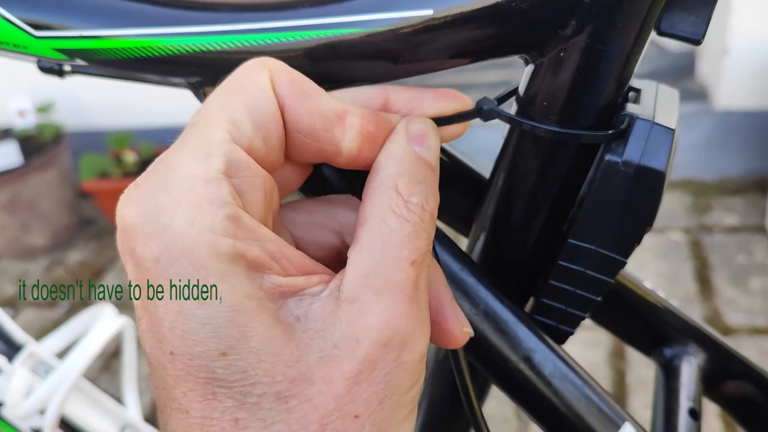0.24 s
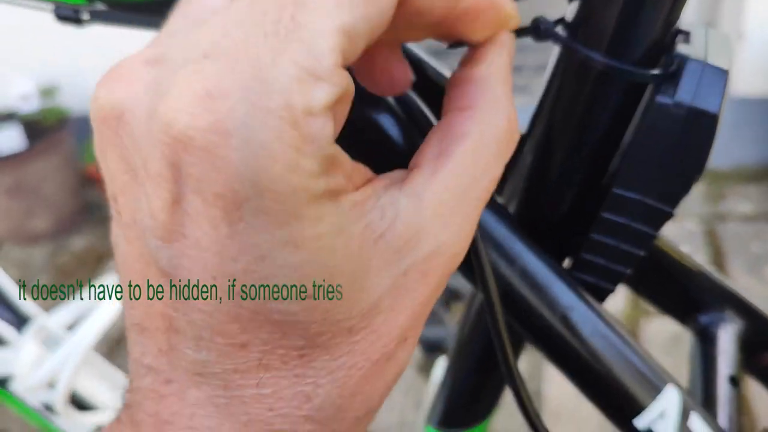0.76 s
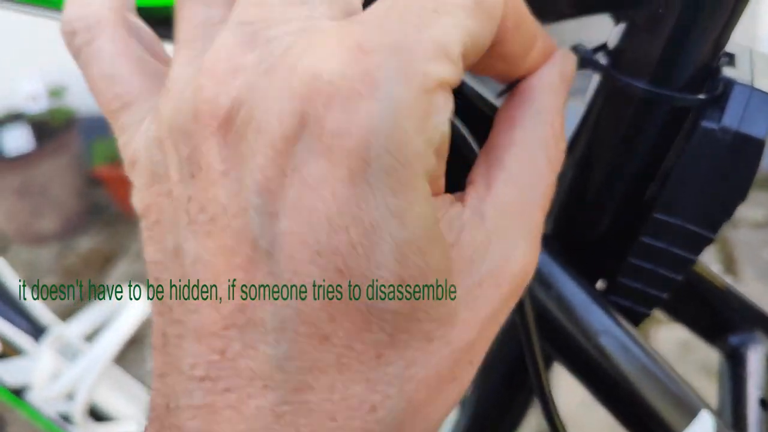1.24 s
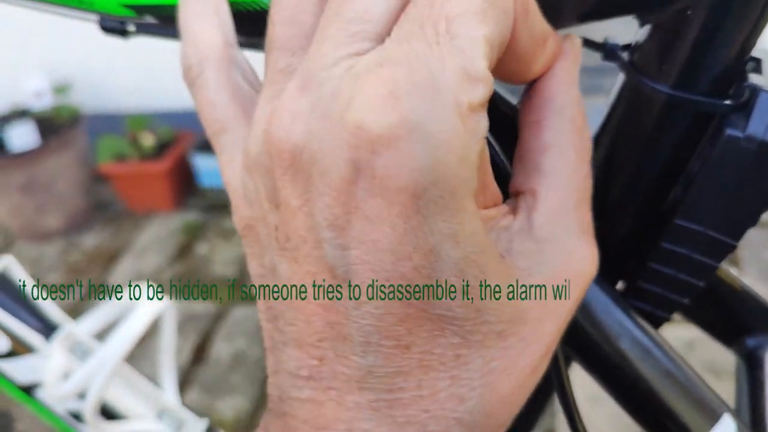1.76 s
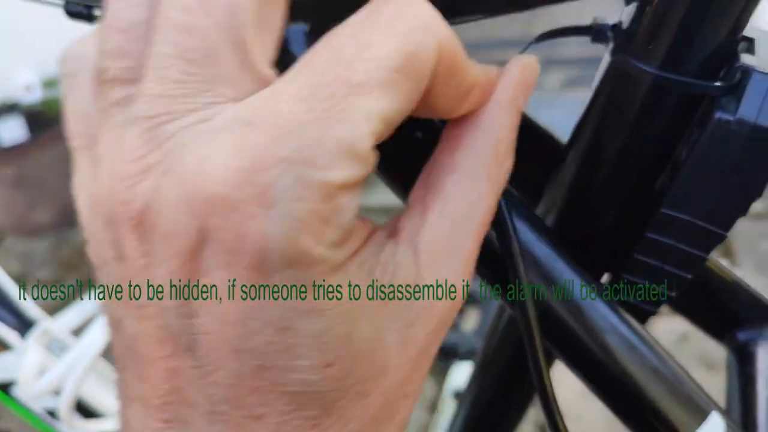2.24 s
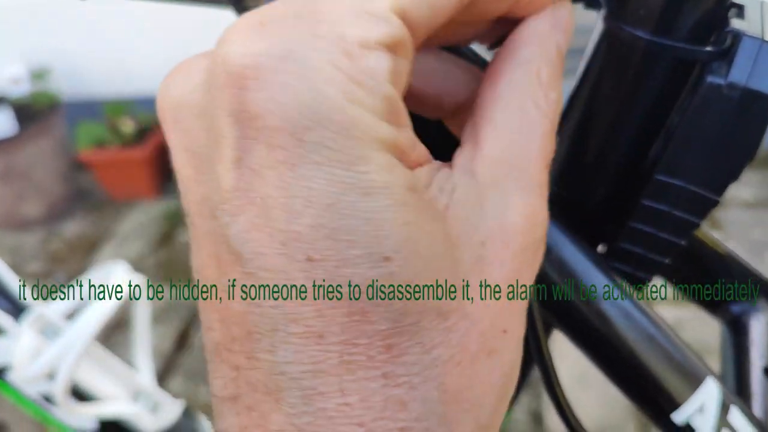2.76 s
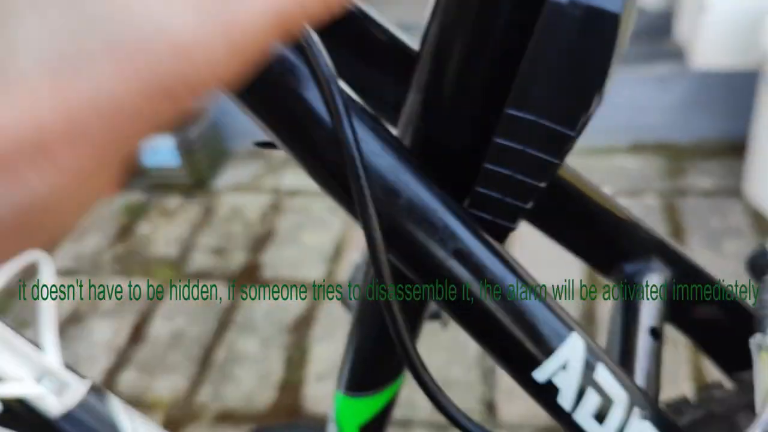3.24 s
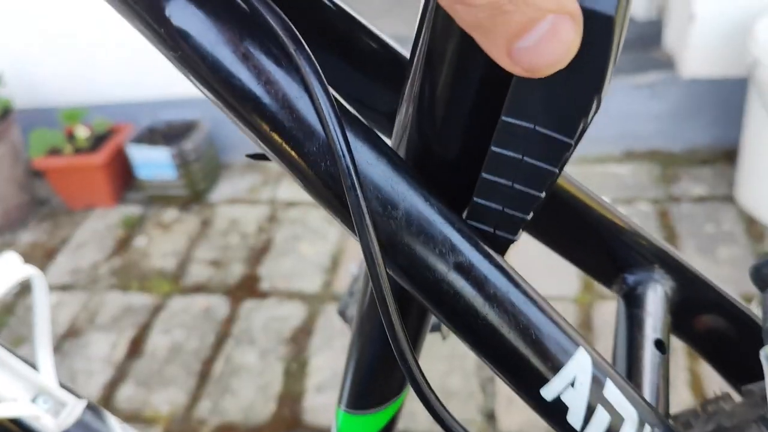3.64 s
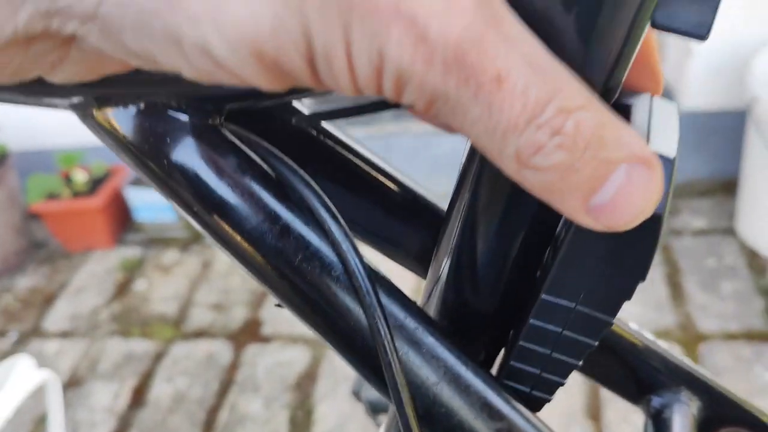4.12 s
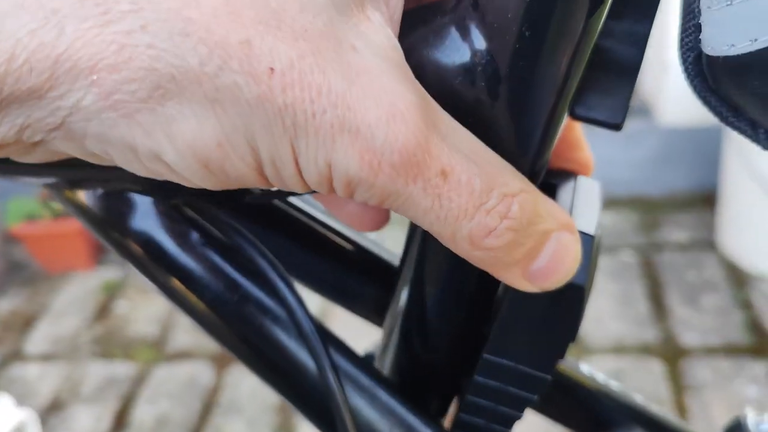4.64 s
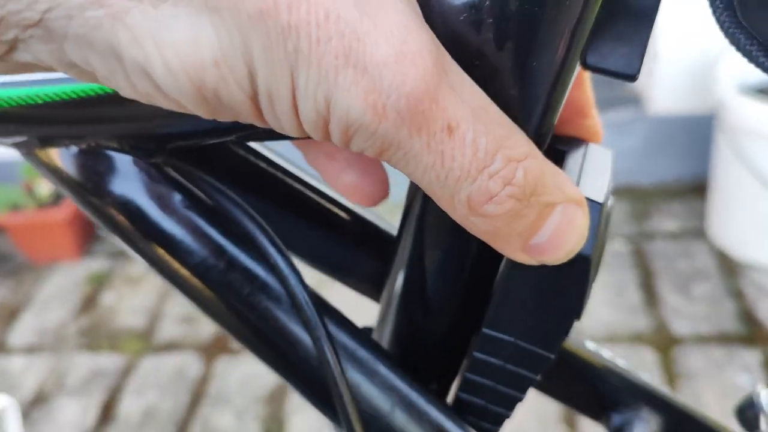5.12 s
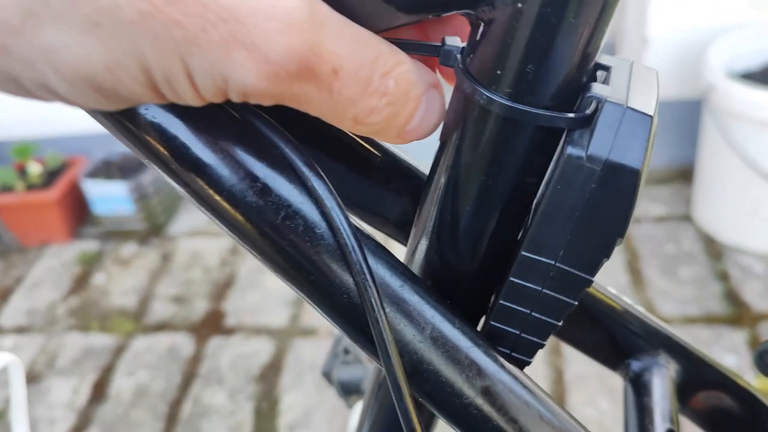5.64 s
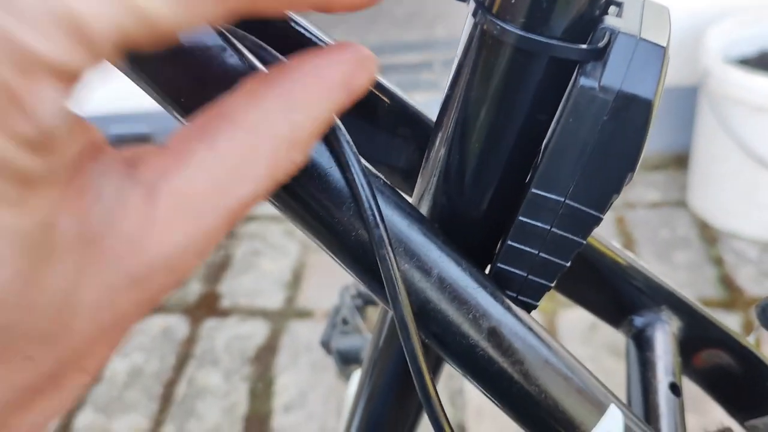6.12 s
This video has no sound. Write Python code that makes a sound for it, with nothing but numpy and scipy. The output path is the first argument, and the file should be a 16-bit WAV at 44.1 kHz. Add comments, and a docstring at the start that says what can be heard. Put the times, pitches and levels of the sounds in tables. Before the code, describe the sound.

Very close, leaning to the right, a nylon cable tie ratchets: a handful of crisp bright snaps at once, a pause with faint rubbing, then a tighter run of snaps. Later, fingers squeak and scrape on a small hollow plastic housing and tap it irregularly. Behind, in an open yard, soft traffic and a low engine drone come gradually nearer.

```python
"""A nylon cable tie is pulled tight round a bicycle tube in a yard, close to the right microphone.
Its pawl snaps from tooth to tooth: noise bursts over the decaying modes of a plastic housing.
Fingers rub on strap and housing: random grains sing in a resonance, scrape and hiss.
A far engine, summed from orders of its camshaft speed, comes slowly nearer over tyre roar.
Farther traffic and the hiss of the yard are coloured stereo noise."""
import sys
import numpy as np
from scipy.fft import rfft, irfft, next_fast_len
from scipy.io import wavfile
from scipy.ndimage import map_coordinates

SR = 44100
rng = np.random.default_rng(int(sys.argv[2]) if len(sys.argv) > 2 else 0)


def inscribe(sig):
    """Save sig as 16-bit PCM at rate SR to the path in sys.argv[1].

    A 1-D sig is mono; a 2-D sig holds one channel per row.
    Samples are clipped to [-1, 1] before scaling.
    """
    pcm = np.round(np.clip(np.atleast_2d(sig).T, -1, 1) * 32767)
    wavfile.write(sys.argv[1], SR, pcm.astype(np.int16))


N = 281358  # samples


def amp(db):
    """Level law: decibels to an amplitude ratio."""
    return 10 ** (np.asarray(db) / 20)


def unit(x):
    """Power normalization: scale to rms 1."""
    return x / np.sqrt(np.mean(x ** 2) + 1e-20)


def along(points, hz):
    """Logarithmic frequency scale: interpolate (Hz, value) points along it."""
    f, v = np.transpose(points)
    return np.interp(np.log(hz + 1), np.log(f + 1), v)


def curves(rows):
    """Linear interpolation in time: one value per sample for each column after the time."""
    s, *columns = np.transpose(rows)
    return [np.interp(np.arange(N) / SR, s, column) for column in columns]


def wobble(rate):
    """Slow random modulation: a smooth curve through random knots, rate of them a second."""
    knots = rng.standard_normal(int(N * rate / SR) + 4)
    return map_coordinates(knots, [np.arange(N) * rate / SR])


def filtered(x, response):
    """Linear filtering: multiply the spectrum of x by a response of frequency."""
    m = next_fast_len(x.shape[-1] + 8192)
    spectrum = rfft(x, m) * response(np.fft.rfftfreq(m, 1 / SR))
    return irfft(spectrum, m)[..., :x.shape[-1]]


def sides(db):
    """Interchannel level difference: left and right gains that differ by db and average to 1."""
    return 2 * np.array([amp(db), np.ones_like(db)]) / (1 + amp(db))


# Interchannel correlation of the noises. Each row: frequency in Hz, left-right likeness from -1 to 1.
LIKENESS = [(60, 0.39), (290, 0.74), (640, 0.47), (1410, -0.13), (3100, -0.19), (7000, 0.72)]
# Interchannel balance of the noises. Each row: frequency in Hz, left level over right in dB.
NOISE_LEAN = [(100, -3), (640, 1), (1410, -8.5), (3100, -3), (6800, -0.5), (15000, -16.5)]


def rush(spectrum):
    """Interchannel coherence: coloured stereo noise from a shared and an opposed part, middle rms 1."""
    def mixing(hz):
        angle = np.arccos(np.clip(along(LIKENESS, hz), -1, 1)) / 2
        return [np.cos(angle), np.sin(angle)]

    shared, opposed = filtered(rng.standard_normal((2, N)), mixing)
    pair = np.array([shared + opposed, shared - opposed])
    pair = filtered(pair, lambda hz: amp(along(spectrum, hz)) * sides(along(NOISE_LEAN, hz)))
    return pair / np.std(pair.mean(0))


# Colour of the yard's hiss. Each row: frequency in Hz, relative level in dB per Hz.
HISS_COLOUR = [(1500, -42), (2500, -26), (3400, -19), (4400, 1), (5150, -6.5), (6000, 0.5), (7700, -7.5),
               (9500, -2.5), (12000, 1), (14300, -10), (14500, -70)]


def hiss():
    """Stationary noise: the steady bright hiss of the yard."""
    return amp(-75.5) * rush(HISS_COLOUR)


# Level of the farther traffic. Each row: time in seconds, level in dB before a random swell.
TRAFFIC_LEVEL = [(0, -69.5), (1, -72), (2, -69.5), (2.8, -67.5), (3.6, -67), (4.7, -65.5), (5.5, -66),
                 (6.38, -67)]
# Colour of the farther traffic. Each row: frequency in Hz, relative level in dB per Hz.
TRAFFIC_COLOUR = [(300, -15.5), (500, -2.5), (650, -7), (800, -0.5), (1000, 3), (1200, -8.5), (1600, -46),
                  (3000, -120)]


def traffic():
    """Amplitude-modulated noise: a dull wash from a road farther off."""
    swell_db = 2 * wobble(4)
    return amp(curves(TRAFFIC_LEVEL)[0] + swell_db) * rush(TRAFFIC_COLOUR)


# Levels of the engine before further random sway: the roar grows, four strong orders waver irregularly.
# Each row: time in seconds, tyre roar in dB, then levels in dB of the four strong orders.
ENGINE_LEVELS = [(0, -63.5, -72, -69, -76, -78), (.5, -63, -78, -66, -81, -86),
                 (1.3, -63, -71, -63.5, -77, -73.5), (2.4, -61, -67, -62.5, -80, -63.5),
                 (3.1, -61, -69, -63, -67, -65), (3.65, -58, -63.5, -66, -64.5, -64.5),
                 (4, -58, -71, -62.5, -73, -58.5), (4.5, -58, -59, -68, -60.5, -60),
                 (4.85, -56.5, -69, -63.5, -67, -67), (5.2, -56.5, -70, -56.5, -70, -62),
                 (5.6, -53, -59, -85, -55.5, -70), (6, -53, -58, -53, -58.5, -54),
                 (6.38, -53, -52, -56, -62, -56)]
STRONG_ORDERS = (3, 4, 8, 12)  # multiples of the camshaft speed
# Speed of the camshaft. Each row: time in seconds, turns a second in Hz.
CAMSHAFT_SPEED = [(0, 19.3), (1, 19), (2, 18.8), (3.5, 18.58), (4.5, 18.4), (6.38, 18.13)]
# Weak orders, before random sway. Each row: order, level at the loudest roar in dB relative to 10 dB
# below that roar, growth in dB per dB of roar.
WEAK_ORDERS = [(7, -2, 1.1), (9, -7, 1.5), (10, -5.5, 0.8), (11, -4, 1.5), (13, 2.5, 2.7), (14, -1, 1.9),
               (15, -7.5, 1.6)]
# Colour of the tyre roar. Each row: frequency in Hz, relative level in dB per Hz.
ROAR_COLOUR = [(20, -22), (60, -18.5), (130, -14), (250, -15.5), (340, -23.5), (520, -23), (1100, -24.5),
               (1450, -17), (1700, -22), (1950, -15.5), (2500, -24.5), (3500, -35), (6000, -56.5),
               (9000, -92)]


def engine():
    """Harmonic synthesis: unsteady camshaft orders, alike in both channels, over tyre-roar noise."""
    roar_db, *strong_db = curves(ENGINE_LEVELS)
    nearest_db = roar_db.max()
    turn = 2 * np.pi * np.cumsum(curves(CAMSHAFT_SPEED)[0]) / SR

    def tone(order, sway_db):
        level = np.sqrt(2) * amp(sway_db * wobble(7))  # rms 1 before the sway
        return level * np.sin(order * turn + 0.41 * wobble(5) + rng.uniform(0, 2 * np.pi))

    drone = sum(amp(db) * tone(order, sway_db=1.67) for order, db in zip(STRONG_ORDERS, strong_db))
    for order, db, growth in WEAK_ORDERS:
        level_db = nearest_db - 10 + db + growth * (roar_db - nearest_db)
        drone += amp(level_db) * tone(order, sway_db=3.5)
    return drone + amp(roar_db + 1.02 * wobble(4.985)) * rush(ROAR_COLOUR)


# Finger strokes. Each row: time of firmest contact in seconds, lead-in in seconds, fade in seconds,
# housing squeak in dB, dry hiss in dB; levels are those at firmest contact, before the slips.
FINGER_STROKES = [(0.41, 0.031, 0.12, -77, -72), (0.56, 0.094, 0.1, -60, -64), (0.715, .03, .14, -69, -66),
                  (0.854, 0.065, 0.023, -57.5, -73), (0.958, 0.057, 0.023, -57, -59.5),
                  (1.03, 0.069, 0.15, -72, -65), (1.94, .05, 0.1, -71, -72), (2.2, 0.073, 0.39, -74, -64.5),
                  (2.29, .1, .06, -88, -66), (2.422, 0.056, 0.047, -78, -61.5), (2.6, 0.17, 0.27, -71, -72),
                  (2.784, 0.11, 0.037, -82, -75), (2.868, .05, 0.056, -75, -63),
                  (3.024, 0.083, 0.06, -72, -70.5), (3.126, 0.035, 0.15, -87, -63),
                  (3.202, .07, 0.024, -68, -61), (3.39, .3, 0.16, -77, -71.5),
                  (3.525, 0.078, 0.12, -54.5, -57), (3.585, 0.065, 0.048, -54.5, -62),
                  (3.66, 0.097, 0.12, -51.5, -60), (3.806, 0.024, 0.056, -50.5, -63.5),
                  (3.914, .06, 0.11, -52, -63), (4.07, 0.14, 0.029, -57.5, -74),
                  (4.14, 0.032, 0.043, -58, -85), (4.226, 0.058, 0.072, -43.5, -66),
                  (4.37, 0.065, 0.05, -59, -74), (4.449, 0.042, 0.036, -66, -79),
                  (5.19, 0.18, 0.12, -63.5, -85), (5.282, 0.037, 0.044, -54, -69),
                  (5.343, 0.058, 0.034, -43, -52.5), (5.385, 0.16, 0.13, -71, -56),
                  (5.51, 0.45, 0.079, -70, -62), (5.65, 0.13, 0.12, -58.5, -68),
                  (5.815, 0.064, 0.11, -63.5, -60.5), (6.152, .08, 0.2, -64, -75),
                  (6.278, .06, 0.18, -71.5, -74.5)]
# Colour of the dry skin hiss. Each row: frequency in Hz, relative level in dB per Hz.
SKIN_COLOUR = [(7000, -10), (8300, -11), (9300, 5.5), (10500, 0.5), (11900, 3.5), (13200, 2), (14300, -2.5),
               (14500, -70)]
# Colour of the scrape. Each row: frequency in Hz, relative level in dB per Hz.
SCRAPE_COLOUR = [(2800, -8), (3400, -5.5), (4200, 6), (4900, -10.5), (5500, -2.5), (6600, -6), (7600, -8.5),
                 (8500, -57)]


def fingers():
    """Stick-slip friction: skin slips in fine grains that sing in the housing, scrape and hiss."""
    fade_db, hold = 22, 1.19  # dB lost over lead-in and over fade; power of time in that loss
    scrape_db = -7.5  # relative to the mean of squeak and hiss in dB
    t, gains = np.arange(N) / SR, np.zeros((3, N))
    for s, lead, fade, squeak_db, hiss_db in FINGER_STROKES:
        away = np.maximum((s - t) / lead, (t - s) / fade)
        levels = amp([squeak_db, hiss_db, (squeak_db + hiss_db) / 2 + scrape_db])
        gains = np.maximum(gains, levels[:, None] * amp(-fade_db * away ** hold))
    squeak_gain, hiss_gain, scrape_gain = gains

    slips = wobble(170) + .5 * wobble(70)
    grains = rng.standard_normal(N) * amp(2.15 * slips)
    hz, width_hz = 2340, 260  # housing resonance, its band-pass applied twice

    def resonance(f):
        return (1j * f * width_hz / (hz ** 2 - f * f + 1j * f * width_hz)) ** 2

    squeak = squeak_gain * sides(-23.0)[:, None] * unit(filtered(grains, resonance))
    dry_hiss = hiss_gain * amp(1.2 * slips) * rush(SKIN_COLOUR)
    scrape = scrape_gain * amp(2.04 * slips) * rush(SCRAPE_COLOUR)
    return squeak + dry_hiss + scrape


# Close modes of the housing, before a small random scatter.
# Each row: multiple of the ring frequency (no unit), relative level in dB.
HOUSING_MODES = [(1, 2), (1.08, -10), (.92, -13), (1.2, -21)]


def ring(t, hz, rise, t60):
    """Modal decay: housing modes swell as the pawl pushes, die away and return off a wall; peak 1."""
    scatter = rng.normal(0, [2.5, .008], (len(HOUSING_MODES), 2))  # dB, fraction of the frequency
    x = sum(amp(db + d) * np.sin(2 * np.pi * hz * k * (1 + e) * t)
            for (k, db), (d, e) in zip(HOUSING_MODES, scatter))
    swell = np.sin(np.pi / 2 * np.clip((t + 0.00041) / (rise + 0.0012), 0, 1)) ** 2
    after = np.maximum(t - rise, 0)
    slow_tail = amp(-29 - 60 * after / 0.086)
    x = x * swell * (amp(-60 * after / t60) + slow_tail)
    echo_s, echo_db = .022, -28.5
    x = x + amp(echo_db) * np.roll(x, round(echo_s * SR))
    return x / np.abs(x).max()


def burst(spectrum, t, t60, tail_db, tail_t60, creep_db, alike, rise):
    """Impulsive noise and reverberation: a spit, a weak tail from nearby walls, and a creep
    before and around the click, faint or strong; peak 1."""
    lag = 8  # samples by which the left channel hears the tie later
    a, b = filtered(rng.standard_normal((2, len(t))), lambda hz: amp(along(spectrum, hz)))
    after = np.maximum(t, 0)
    decay = amp(-60 * after / t60) + amp(tail_db - 60 * after / tail_t60)
    shape = decay * (1 - np.exp(-after / rise))
    shape += amp(creep_db - 60 * np.abs(t) / 0.0083)
    left = alike * np.roll(a, lag) + np.sqrt(np.clip(1 - alike ** 2, 0, 1)) * b
    x = shape * np.array([left, a])
    return x / np.abs(x).max(axis=1, keepdims=True)


# Colour of the strap's knock on the tube. Each row: frequency in Hz, relative level in dB.
KNOCK_COLOUR = [(200, -31), (450, -21), (780, 1), (1050, -12), (1400, -0.5), (1700, 4.5), (2100, -90),
                (4000, -72)]
# Colour of the bright snap. Each row: frequency in Hz before the pitch factor, relative level in dB.
SNAP_COLOUR = [(7500, -30.5), (9300, -13.5), (10600, -7.5), (12400, -5.5), (14000, -2), (15000, -32),
               (16300, -58)]
# The tube's dull answer to a snap. Each row: frequency in Hz, relative level in dB.
THUD_COLOUR = [(120, -28), (250, -5), (400, -2.5), (600, -34), (1000, -17), (2000, -64)]
# Colour of the crack. Each row: frequency in Hz before the pitch factor, relative level in dB.
CRACK_COLOUR = [(2200, -22), (2750, 8.5), (3500, 4), (4400, 3.5), (5500, -7.5), (6800, 3.5), (8000, -16),
                (11000, -81)]


def click(t, snap_db, ring_db, knock_db, crack_db, hz, rise_ms, lean_db, kind):
    """Impact excitation: one click rings the housing, knocks the tube, cracks and snaps."""
    ring_t60, knock_t60, crack_t60, pitch, crack_pitch = kind
    housing = ring(t, hz, rise_ms / 1000, ring_t60)
    knock = burst(KNOCK_COLOUR, t, knock_t60, tail_db=-16, tail_t60=0.07,
                  creep_db=-33, alike=1.0, rise=0.00049)
    snap = burst(SNAP_COLOUR * np.array([pitch, 1]), t, t60=.01, tail_db=-17.0, tail_t60=0.075,
                 creep_db=-18, alike=0.23, rise=0.00041)
    thud = burst(THUD_COLOUR, t, t60=0.014, tail_db=-24, tail_t60=0.11,
                 creep_db=-52, alike=0.84, rise=0.00083)
    crack = burst(CRACK_COLOUR * np.array([crack_pitch, 1]), t, crack_t60, tail_db=-21, tail_t60=0.16,
                  creep_db=-4, alike=0.51, rise=0.00063)
    u = np.maximum(t, 0) / .00009  # time in units of the push's peak time, 0.09 ms
    push = u * np.exp(1 - u)  # the pawl's one hard push

    x = amp(ring_db) * sides(-18.5)[:, None] * housing
    x = x + amp(knock_db) * sides(-3.5)[:, None] * knock
    x = x + amp(snap_db) * sides(lean_db)[:, None] * snap
    x = x + amp(snap_db - 29.5) * thud
    x = x + amp(snap_db - 24.5) * sides(-6.0)[:, None] * push
    return x + amp(crack_db) * sides(-.1)[:, None] * crack


# The pawl drops over a tooth. Each row: time in seconds, snap in dB, housing ring in dB, knock in dB,
# crack in dB, ring frequency in Hz, ring rise in ms (its swell takes 1.2 ms more),
# left level of the snap over right in dB.
PAWL_SNAPS = [(0.0264, -22.5, -27.5, -38, -32, 2306, 3.1, -8),
              (0.063, -21.5, -21.5, -37.5, -31.5, 2370, 4.3, -10),
              (0.0886, -21, -32, -40, -34, 2470, 2, -11), (0.241, -18.5, -31, -30.5, -35.5, 2370, 3.5, -13),
              (0.2669, -19, -27.5, -38, -36, 2320, 1.9, -13),
              (0.359, -20.5, -33, -35, -45, 2314, 2.9, -9.5), (1.4894, -18, -33.5, -49, -39, 2070, 1.5, -6),
              (1.5014, -20, -34, -38.5, -38, 2300, 2.3, -10),
              (1.5387, -20, -27.5, -43.5, -34, 2370, 0.53, -8),
              (1.5961, -18.5, -27, -44, -31.5, 2420, 0.42, -8),
              (1.648, -20.5, -30.5, -42, -31, 2390, 0.52, -12),
              (1.733, -19, -35, -63, -34.5, 2350, 0.91, -7), (1.826, -21, -37, -68, -34.5, 2390, 2, -7),
              (1.8744, -21, -51, -71, -35.5, 2570, 1.8, -13), (3.345, -51, -61, -62, -51.5, 2170, 1.3, -14),
              (5.1092, -41.5, -32, -34, -39.5, 2336, 0.87, -16)]
# The strap jerks and taps the housing. Each row: time in seconds, housing ring in dB, knock in dB,
# crack in dB, ring frequency in Hz, ring rise in ms (its swell takes 1.2 ms more).
STRAP_TAPS = [(0.1326, -50, -58, -49, 2470, 1.5), (0.1665, -50, -53, -58, 2480, 1.7),
              (0.1848, -44.5, -63, -63, 2500, 0.54), (0.3177, -40.5, -46.5, -50, 2440, 1.4),
              (0.3484, -34.5, -45, -61, 2120, .9), (0.4289, -50, -55, -63, 2280, 2.6),
              (0.5347, -50, -52, -52, 2300, 1.3), (0.5596, -42.5, -52, -53, 2490, 0.9),
              (0.5765, -41, -54, -57, 2380, 0.6), (0.843, -55, -57, -56, 2350, 1.7),
              (0.9338, -39.5, -50, -62, 2260, 1.1), (0.9629, -37.5, -52, -64, 2310, 0.82),
              (1.482, -35, -45, -41, 2320, 3.4), (1.8402, -31.5, -42.5, -44, 2330, 1.3),
              (1.8479, -34, -46, -54, 2410, 1.3), (1.8607, -43, -61, -67, 2390, 1.3),
              (1.8914, -29, -38, -44, 2350, 1.3), (1.9005, -40.5, -63, -66, 2340, 0.75),
              (2.151, -24.5, -36, -41.5, 2316, 2.2), (3.2002, -50, -47, -61, 2350, 1.5),
              (3.5269, -41, -53, -45, 2360, 1.6), (3.6955, -35.5, -41.5, -42.5, 2380, 2.4),
              (3.8033, -42.5, -54, -53, 2400, 2.7), (4.5855, -43, -57, -63, 2420, 1.5),
              (4.59, -22.5, -40.5, -45, 2284, 2.2), (4.5935, -31.5, -46, -27, 2940, 1.1),
              (4.627, -22, -38, -43, 2290, 2.6), (4.6757, -19.5, -36, -36, 2294, 2.94),
              (4.775, -33.5, -58, -46.5, 2270, 1.6), (4.8255, -29.5, -53, -46, 2250, 2.5),
              (4.835, -35, -40, -46, 2250, 2.3), (4.844, -26.5, -38, -43, 2230, 1.9),
              (4.9875, -32.5, -46, -55.5, 2175, 2.5), (5.059, -37, -36.5, -54, 2220, 2.4),
              (5.0625, -36, -41, -43.5, 2270, .9), (5.066, -29.5, -44, -60, 2216, 1.4),
              (5.1164, -37, -42.5, -39.5, 2310, 1.8), (5.2792, -31.5, -43, -56, 2330, 1.8),
              (5.2858, -38, -51, -50, 2300, .6), (5.316, -40, -46, -42.5, 2720, 1.8),
              (5.325, -36, -50, -42, 2320, 2), (5.3325, -33.5, -48, -46, 2290, 1.5)]
# Each kind: 60 dB decay times in seconds of ring, knock and crack; pitch factors of snap and crack.
SNAP_KIND = (0.017, .009, 0.016, 0.98, 1.023)
TAP_KIND = (0.012, 0.037, 0.025, 0.88, .93)


def ratchet():
    """Superposition of impacts: bright snaps of the pawl and duller taps of the strap."""
    tap_snap_db, tap_lean_db = -21, -9  # snap of a tap relative to its ring; left over right
    lead = 400  # samples before the click, for its creep
    out, t = np.zeros((2, N + SR)), (np.arange(SR // 8) - lead) / SR
    rows = [(*row, SNAP_KIND) for row in PAWL_SNAPS]
    for s, ring_db, *rest in STRAP_TAPS:
        rows.append((s, ring_db + tap_snap_db, ring_db, *rest, tap_lean_db, TAP_KIND))
    for s, *how in rows:
        start = round(s * SR) - lead
        out[:, start:start + len(t)] += click(t, *how)
    return out[:, :N]


def scene():
    """Linear superposition: all sources add at the microphones."""
    return hiss() + traffic() + engine() + fingers() + ratchet()


def record(dry):
    """Band limitation: nothing sounds above 16340 Hz."""
    return filtered(dry, lambda hz: hz < 16340)


dry = scene()
out = record(dry)
inscribe(out)
```